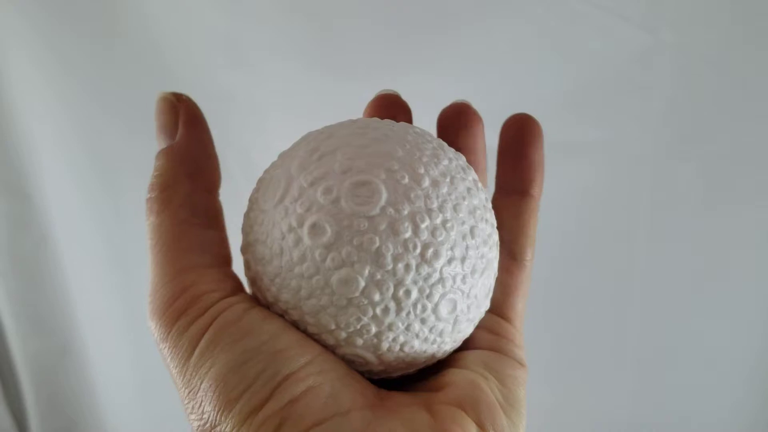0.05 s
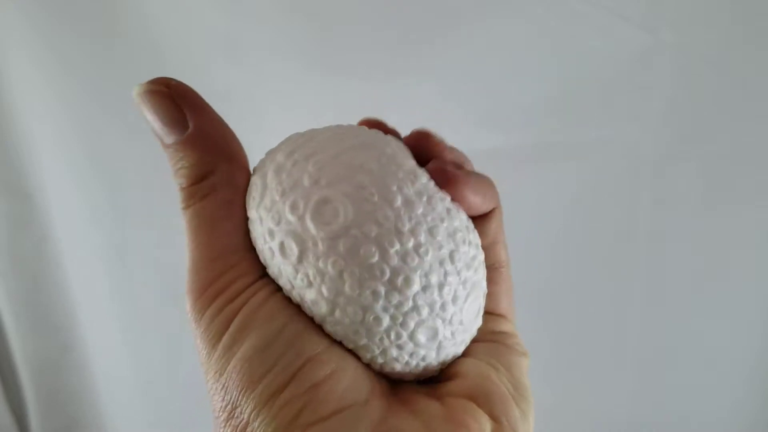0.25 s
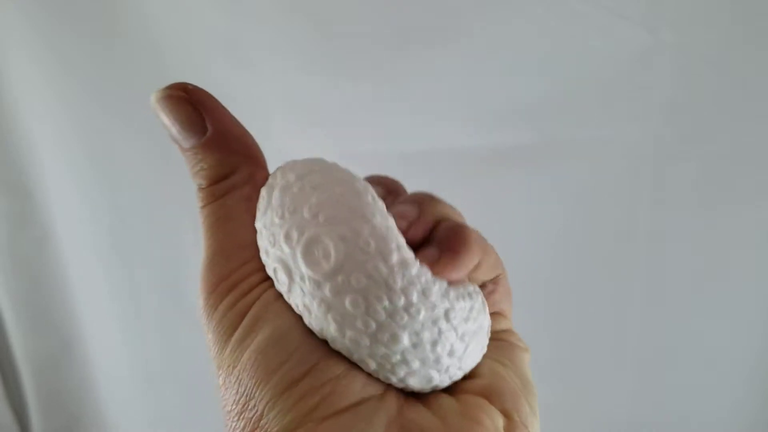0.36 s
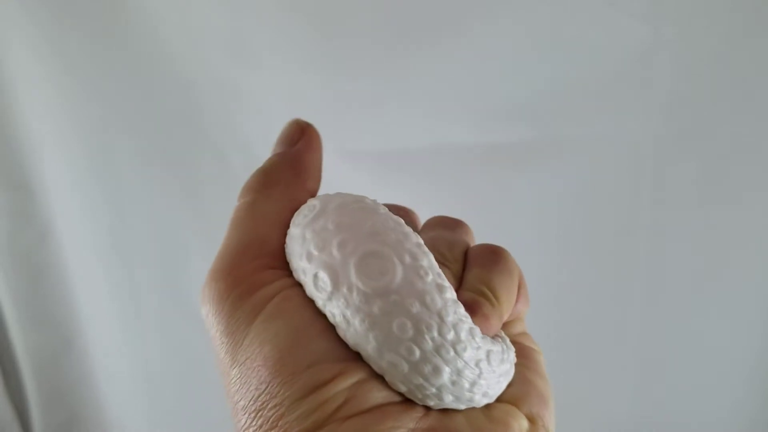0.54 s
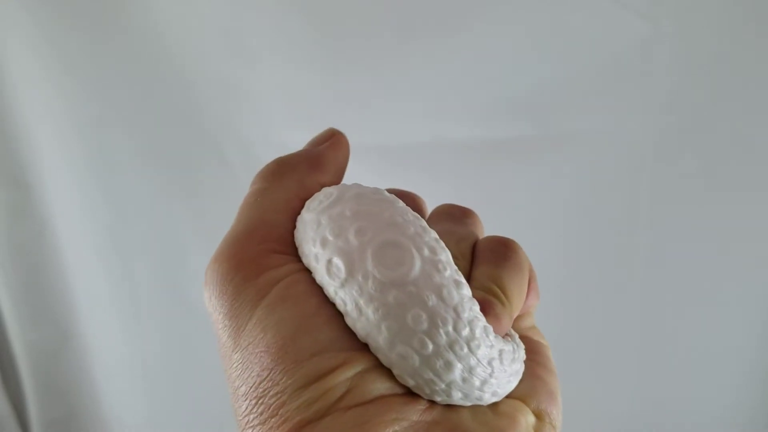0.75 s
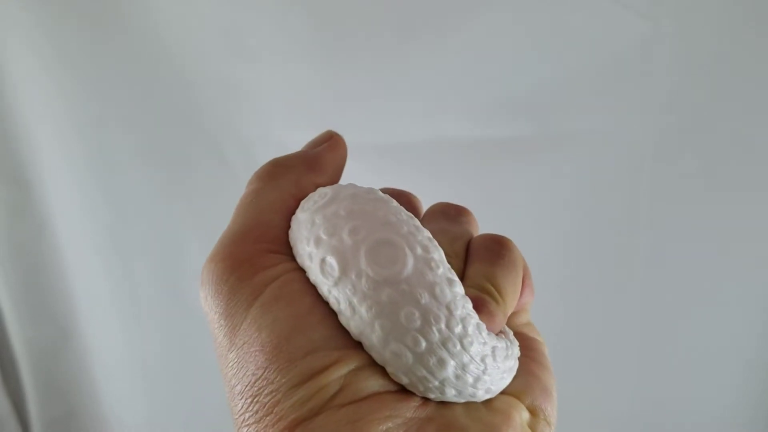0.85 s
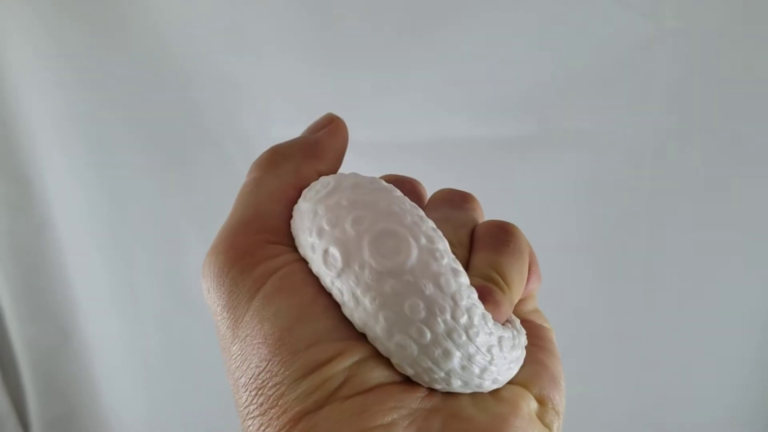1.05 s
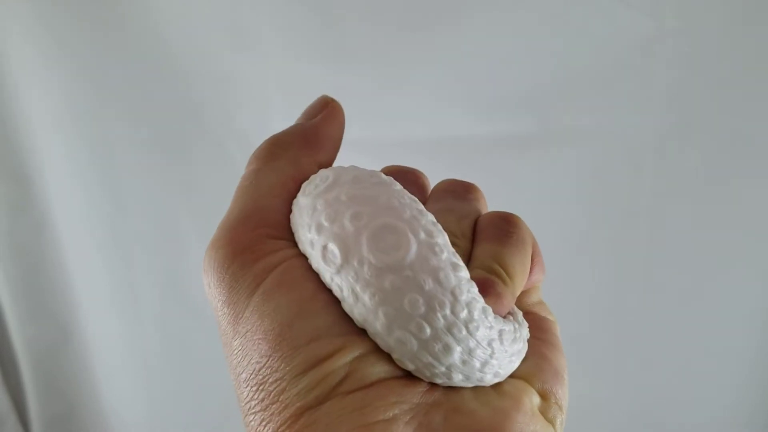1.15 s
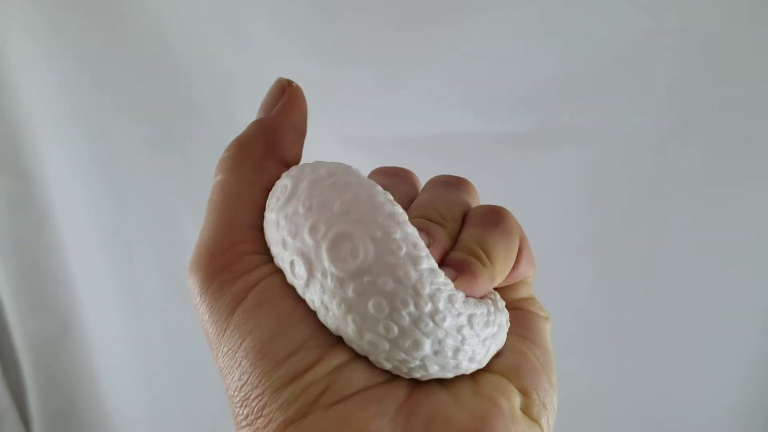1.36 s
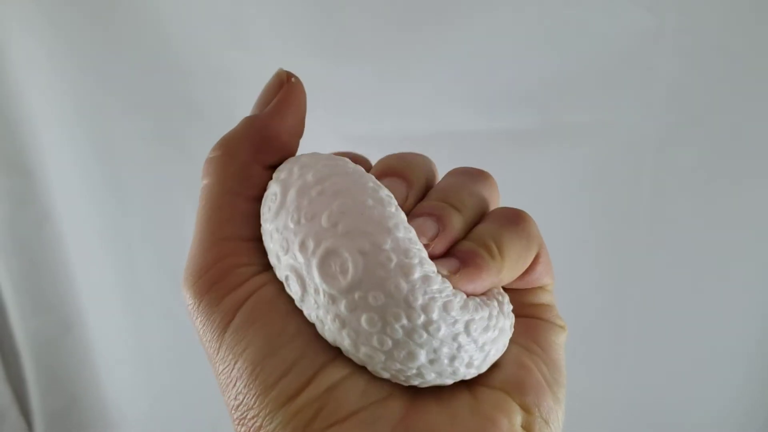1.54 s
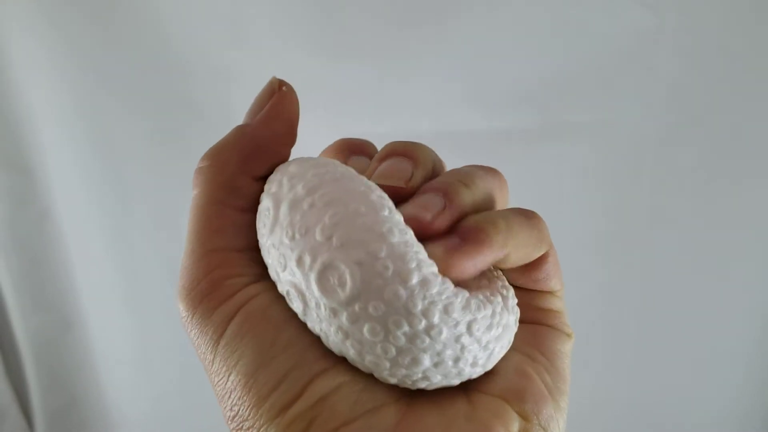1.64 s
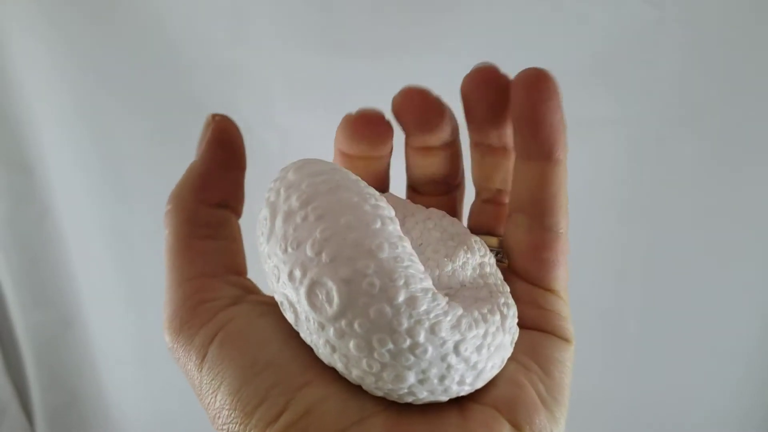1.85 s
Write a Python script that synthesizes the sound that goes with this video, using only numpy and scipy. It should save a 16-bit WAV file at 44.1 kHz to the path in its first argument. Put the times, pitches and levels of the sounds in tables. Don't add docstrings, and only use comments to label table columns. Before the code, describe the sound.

A foam ball squeezed in a hand lets out a short bright hiss; after a pause, air seeps faintly back and fingers peel off with dry crackle, close stereo microphone, quiet room with low distant thuds.

```python
import sys
import numpy as np
from scipy import signal
from scipy.fft import rfft, irfft, next_fast_len
from scipy.io import wavfile
from scipy.ndimage import uniform_filter1d, map_coordinates

SR = 44100
rng = np.random.default_rng(int(sys.argv[2]) if len(sys.argv) > 2 else 0)


def amplitude_ratio(level_db):
    exponent = np.asarray(level_db, float) / 20
    return 10 ** exponent


def transcribe(signal):
    frames = np.atleast_2d(signal).T
    limited = np.clip(frames, -1, 1)
    pcm = np.round(limited * 32767).astype(np.int16)
    wavfile.write(sys.argv[1], SR, pcm)


N = 83790
START_S = 4669 / 44100
IN_LEAD_S = 0.00013

# pitch_hz, likeness (0 to 1)
ROOM_ALIKE = [(60, 1), (180, 0.94), (550, 0.36), (1650, 0.16), (4970, 0.043), (15000, 0.12)]
# pitch_hz, balance_db
ROOM_PAN = [(60, 0.9), (2000, 3.5), (5000, 2.5), (8000, 1), (11500, 1.6), (15500, -12)]
# pitch_hz, balance_db
OUT_PAN = [(3000, 2), (6500, 0), (8000, -3), (9700, 1.5), (12000, -4), (15500, -6.5)]
# pitch_hz, likeness (0 to 1)
IN_ALIKE = [(1400, 0.49), (6000, 0.33), (9000, 0.2), (15000, 0.21)]
# pitch_hz, balance_db
IN_PAN = [(1400, 8), (4500, -2), (6500, 6.5), (8300, -5), (11000, -6.5), (15500, -9)]


def unit(x):
    return x / np.sqrt(np.mean(x ** 2) + 1e-20)


def along(points, hz):
    f, v = np.transpose(points)
    return np.interp(np.log(hz + 1), np.log(f + 1), v)


def curves(rows, outside=None):
    s, *cols = np.transpose(rows)
    return [np.interp(np.arange(N) / SR, s, c, outside, outside) for c in cols]


def wobble(rate):
    knots = rng.standard_normal(int(N * rate / SR) + 4)
    return map_coordinates(knots, [np.arange(N) * rate / SR])


def filtered(x, response):
    m = next_fast_len(N + SR // 2)
    return irfft(rfft(x, m) * response(np.fft.rfftfreq(m, 1 / SR)), m)[..., :N]


def rush(spectrum, alike, pan, grain_db=0, patchy_db=0, lead_s=0):
    grainy = rng.standard_normal((2, N)) * amplitude_ratio(grain_db * wobble(900))
    z = signal.stft(grainy, nperseg=256)[2]
    field = rng.standard_normal(z.shape[1:])
    for axis in (0, 1):
        field = uniform_filter1d(field, size=5, axis=axis)
    pair = signal.istft(z * amplitude_ratio(patchy_db * unit(field)), nperseg=256)[1][:, :N]

    def color_and_spread(hz):
        angle = np.arccos(np.clip(along(alike, hz), 0, 1)) / 2
        level_db = along(spectrum, hz) - 160 * (hz < spectrum[0][0] / 2)
        return amplitude_ratio(level_db) * [np.cos(angle), np.sin(angle)]

    shared, apart = filtered(pair, color_and_spread)
    side = np.array([[1], [-1]])

    def balance_and_lead(hz):
        return amplitude_ratio(side * along(pan, hz) / 2) * np.exp(1j * np.pi * side * hz * lead_s)

    out = filtered(np.array([shared + apart, shared - apart]), balance_and_lead)
    return out / np.sqrt(np.mean(out.mean(0) ** 2))


def room_hiss():
    # pitch_hz, level_db (per Hz)
    floor_color = [(350, -8), (600, -10), (1400, -12.5), (3500, -13), (5000, -18.5), (8500, -24.5),
                   (12000, -10.5), (15800, -11)]
    return amplitude_ratio(-81.5 + 0.38 * wobble(5.5)) * rush(floor_color, ROOM_ALIKE, ROOM_PAN, patchy_db=.8)


def port_ring():
    # pitch_hz, level_db (per Hz)
    port_color = [(5200, -32), (5900, -10.5), (6500, -2.5), (7100, -8), (7900, -46.5), (9000, -120)]
    return amplitude_ratio(-94.5) * rush(port_color, ROOM_ALIKE, [(6500, 16)], patchy_db=-0.3)


def boom():
    # time_s, level_db
    thuds = [(0.12, -44.5), (0.198, -40.5), (0.306, -50), (0.334, -57.5), (0.462, -55), (0.644, -63),
             (0.668, -59), (0.692, -47), (0.8, -41), (1.1, -63), (1.168, -69.5), (1.212, -65), (1.31, -49),
             (1.438, -57.5), (1.55, -66), (1.692, -64.5), (1.8, -74), (1.88, -68.5)]
    # pitch_hz, phase_wander_radians, level_db, share of the thuds' swing (0 to 1)
    upper_modes = [(64.1, 1.2, -64.5, 0.14), (113.6, 1, -69.5, 0.32), (87.64, 2.5, -71.5, .45)]
    # pitch_hz, level_db (per Hz)
    rumble_color = [(76, -31), (130, -7.5), (146, -13.5), (307, -21), (434, -33.5), (575, -42.5),
                    (700, -48.5), (910, -86), (1540, -120)]
    # pitch_hz, level_db (per Hz)
    sub_color = [(15, -25), (27, 0), (38, 0), (46, -14), (70, -50), (120, -130)]
    lowest_hz, drift_radians = 52, .5

    level_db, = curves(thuds)
    swing_db = level_db + 60.5
    t = np.arange(N) / SR - START_S
    settle = np.clip(t / .05, 0, 1)
    drift = drift_radians * wobble(9) * settle
    low = -np.sqrt(2) * np.cos(2 * np.pi * lowest_hz * t - .45 + drift)

    def ring(hz, wander):
        phase = 2 * np.pi * hz * t + wander * wobble(11) * settle
        return amplitude_ratio(3.2 * wobble(11.95)) * -np.sin(phase)

    def all_upper():
        return sum(amplitude_ratio(db + 3.5 + share * swing_db) * ring(hz, wander)
                   for hz, wander, db, share in upper_modes)

    mid, side = all_upper(), all_upper()
    modes = amplitude_ratio(level_db) * low + mid + amplitude_ratio(-17) * side * [[1], [-1]]
    sub = settle * amplitude_ratio(level_db - 19) * rush(sub_color, ROOM_ALIKE, ROOM_PAN)
    rumble_db = -76.5 + 0.47 * swing_db + 2.2 * wobble(20)
    rumble = amplitude_ratio(rumble_db) * rush(rumble_color, ROOM_ALIKE, ROOM_PAN, patchy_db=2.5)
    return modes * amplitude_ratio([[.8], [-.8]]) + sub + rumble


def fingers():
    # time_s, level_db
    peeling = [
        (1.49, -90.5),
        (1.545, -74.5),
        (1.57, -79),
        (1.6, -77),
        (1.635, -79),
        (1.655, -73),
        (1.686, -66),
        (1.712, -81),
        (1.77, -94),
    ]
    # pitch_hz, level_db (per Hz)
    skin_color = [(2650, -44), (4500, -23), (5820, -19), (6560, -9.5), (8310, -30), (11700, -9),
                  (15800, -3.5)]
    # pitch_hz, level_db (per Hz)
    rub_color = [(500, -35), (780, -2), (860, -12), (940, -2), (1150, -11), (2200, -4), (4500, -11),
                 (6000, -60)]
    # time_s, level_db
    ticks = [
        (0.685, -81),
    ]
    # pitch_hz, level_db (per Hz)
    knuckle_color = [(800, -30), (1600, -3), (4000, 0), (6000, -8), (9000, -60)]
    tick_s = .03

    peel_db, = curves(peeling, outside=-130)
    peel_db = peel_db + 1.3 * wobble(70)
    skin = amplitude_ratio(peel_db + 9) * rush(skin_color, IN_ALIKE, IN_PAN, grain_db=-1.5, patchy_db=1,
                                   lead_s=IN_LEAD_S)
    rub_db = 0.96 * (peel_db + 66) - 69 - 11.5
    rub = amplitude_ratio(rub_db) * rush(rub_color, IN_ALIKE, IN_PAN, grain_db=0.5, patchy_db=0.5, lead_s=IN_LEAD_S)
    t = np.arange(N) / SR
    tick_level = sum(amplitude_ratio(db - 60 * np.abs(t - s) / tick_s) for s, db in ticks)
    return skin + rub + tick_level * rush(knuckle_color, IN_ALIKE, OUT_PAN)


def refill():
    # time_s, flow_db
    inflow = [
        (1.22, -102),
        (1.29, -89),
        (1.36, -79),
        (1.5, -81),
        (1.6, -73.5),
        (1.7, -84),
        (1.76, -81),
        (1.9, -85),
    ]
    # pitch_hz, level_db (per Hz)
    seep_color = [(6000, -59), (10000, -26.5), (12000, -14.5), (14000, -8), (15800, -8.5)]
    # time_s, pitch_hz, level_db
    pore_whistle = [
        (1.22, 11700, -100),
        (1.27, 11900, -93),
        (1.33, 14200, -92),
        (1.36, 14600, -108),
    ]

    flow_db, = curves(inflow, outside=-130)
    seep = amplitude_ratio(flow_db + 1.3 * wobble(60)) * rush(seep_color, IN_ALIKE, IN_PAN, grain_db=2.5,
                                                  patchy_db=3, lead_s=IN_LEAD_S)
    hz, db = curves(pore_whistle)
    sounding = (hz > 11700) * (db > -107)
    broken = (1 + .8 * wobble(250)) * amplitude_ratio(3 * wobble(40)) * sounding
    whistle = amplitude_ratio(db) * broken * np.sin(2 * np.pi * np.cumsum(hz) / SR)
    return seep + whistle * amplitude_ratio([[-2.5], [2.5]])


def squeeze():
    # time_s, flow_db
    outflow = [
        (.328, -94),
        (.344, -63),
        (.364, -51.5),
        (.4, -53.5),
        (.432, -59),
        (.462, -58),
        (.497, -60.5),
        (.524, -71),
        (.66, -99.5),
    ]
    # pitch_hz, level_db (per Hz)
    fine_color = [(5000, -66), (8500, -19), (10500, -9.5), (12300, -1.5), (15800, -2.5)]
    # pitch_hz, level_db (per Hz)
    wide_color = [(1500, -23.5), (2500, -20.5), (4000, -18.5), (5300, -9), (6400, -0.5), (7400, -2),
                  (8600, -14), (11000, -60)]
    # pitch_hz, likeness (0 to 1)
    out_alike = [(2000, 0.78), (5500, 0.54), (8000, 0.34), (12000, 0.41), (15000, 0.16)]
    lead_s = 90e-6
    flutter_db = 1.3

    flow_db, = curves(outflow, outside=-130)
    flow_db = flow_db + flutter_db * wobble(70)
    fine = amplitude_ratio(flow_db) * rush(fine_color, out_alike, OUT_PAN, patchy_db=2, lead_s=lead_s)
    wide_db = 0.87 * (flow_db + 56) - 62 - 9.5 + flutter_db * wobble(44.4)
    closing_db = 24 * (np.arange(N) / SR - .36)
    wide = amplitude_ratio(wide_db - closing_db) * rush(wide_color, out_alike, OUT_PAN, patchy_db=1, lead_s=lead_s)
    return fine + wide


def scene():
    return room_hiss() + port_ring() + boom() + fingers() + refill() + squeeze()


def top_cut(x):
    return signal.sosfilt(signal.butter(12, 15900, fs=SR, output="sos"), x)


def record(dry):
    # time_s, level_db
    cut_tick = (.1032, -57)
    t = np.arange(N) / SR
    gate = np.clip((t - START_S) * SR / 2 + .7, 0, 1)
    u = (t - cut_tick[0]) * SR / 1.05
    tick = -amplitude_ratio(cut_tick[1]) * 1.6 * u * np.exp(-u * u / 2)
    mix = filtered(dry * gate + tick, lambda hz: hz < 15830)
    return top_cut(mix)


dry = scene()
out = record(dry)
transcribe(out)
```